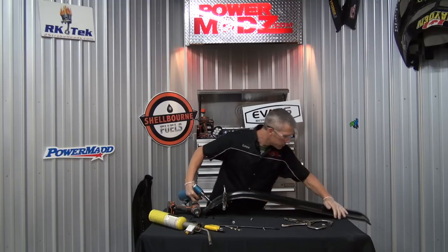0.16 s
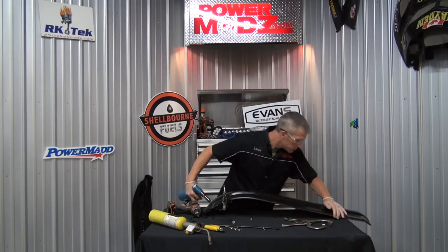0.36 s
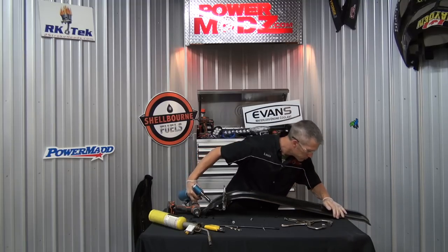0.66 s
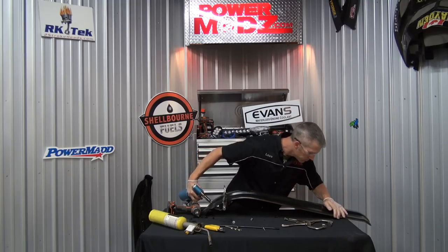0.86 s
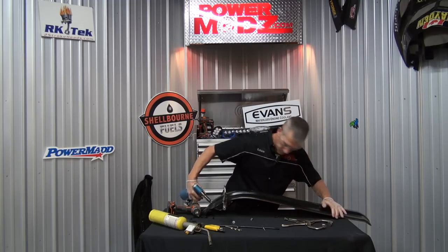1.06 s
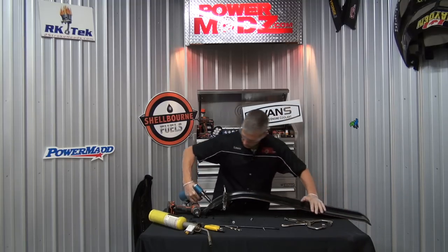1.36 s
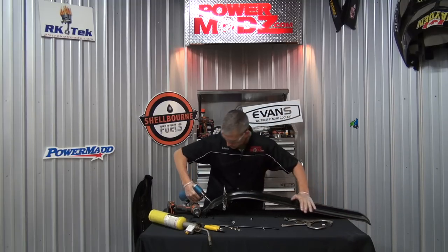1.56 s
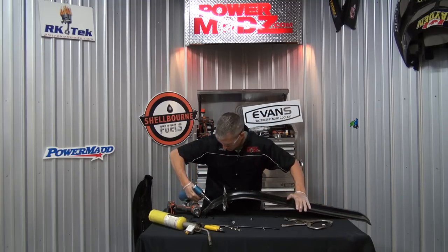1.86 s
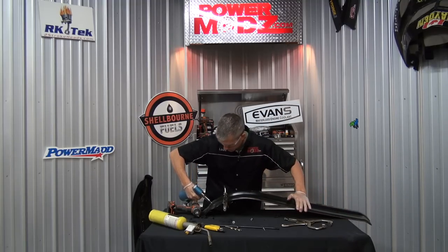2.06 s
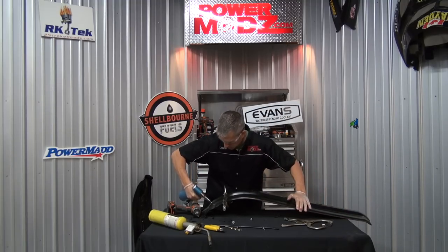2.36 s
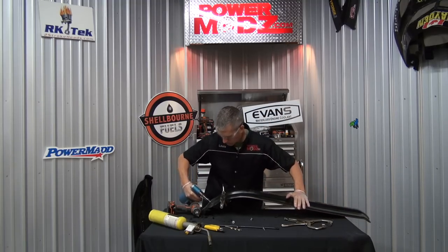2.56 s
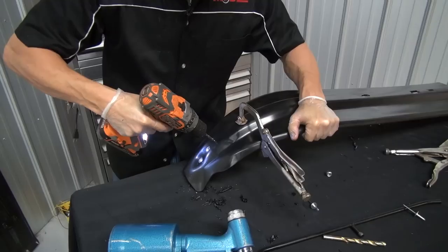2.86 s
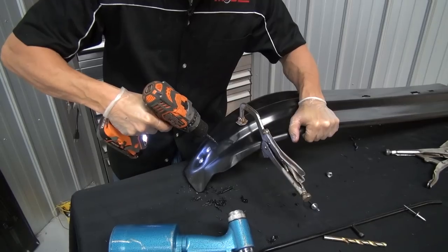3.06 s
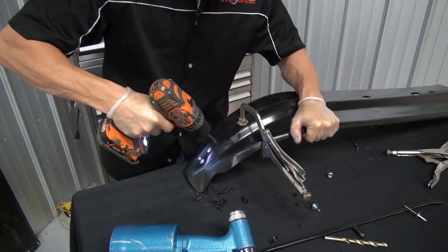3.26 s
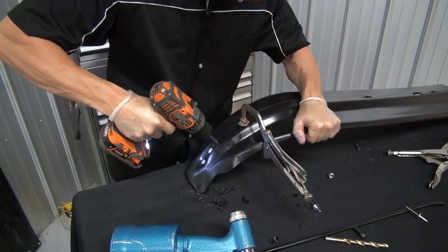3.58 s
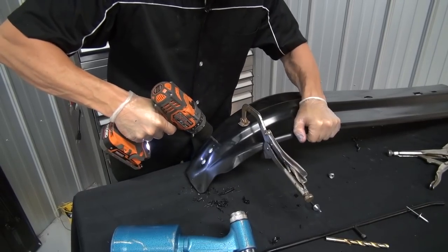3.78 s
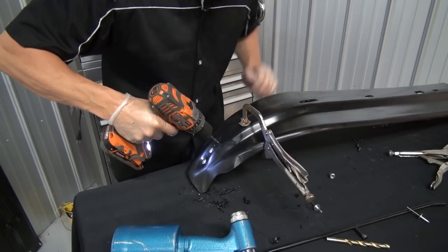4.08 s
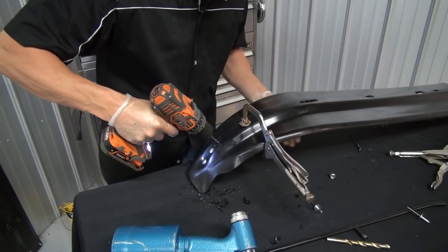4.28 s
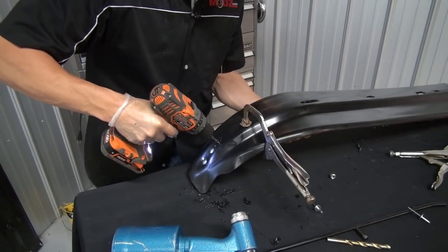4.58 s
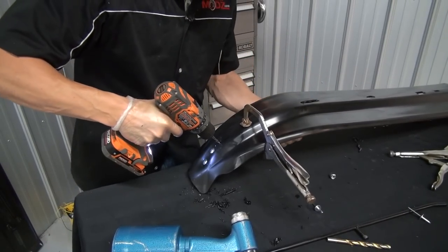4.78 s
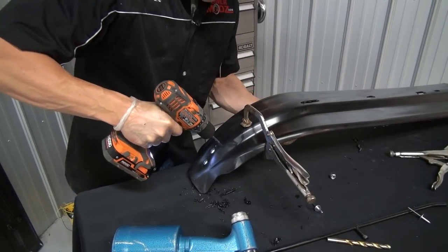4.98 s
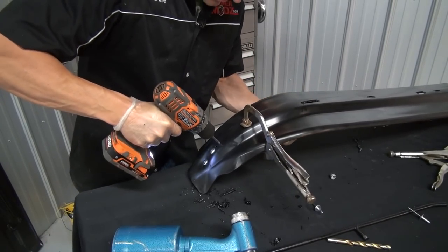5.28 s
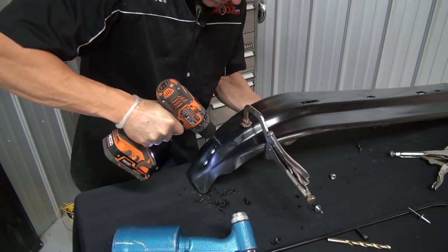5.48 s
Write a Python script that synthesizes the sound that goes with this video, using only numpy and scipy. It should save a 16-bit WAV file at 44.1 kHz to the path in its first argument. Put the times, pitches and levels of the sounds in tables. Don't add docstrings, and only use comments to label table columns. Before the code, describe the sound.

A steady faint air hiss fills a metal-walled workshop. A plastic ski lands on a bench with a hard double knock, is lightly rubbed, then banged, dragged and slid with bright gritty scrapes. The sound cuts to a closer position with louder hiss, where a cordless drill spins up, whines and brakes, then after quiet handling and a rubbery squeak starts again. One microphone, distant at first, then near.

```python
import sys
import numpy as np
from scipy import signal
from scipy.fft import rfft, irfft
from scipy.io import wavfile
from scipy.ndimage import uniform_filter1d, map_coordinates

SR = 44100
rng = np.random.default_rng(int(sys.argv[2]) if len(sys.argv) > 2 else 0)


def materialize(psi):
    bounded = np.clip(np.atleast_2d(psi).T, -1, 1)
    quanta = np.round(bounded * 32767).astype(np.int16)
    wavfile.write(sys.argv[1], SR, quanta)


def convert_level_to_amplitude(level_db):
    exponent = np.asarray(level_db, float) / 20
    return 10 ** exponent


N = 248272
NEARER_S = 2.898

# (frequency [Hz], density [dB per Hz])
FAR_LEAK_COLOUR = [(40, -45), (70, -18), (130, -11.5), (300, -15), (650, -9.5), (950, -9), (1900, -14),
                   (2700, -6.5), (4400, -11.5), (8500, -13), (10200, -5), (11500, -12.5), (14500, -11.5),
                   (16000, -19.5)]
NEAR_LEAK_COLOUR = [(40, -45), (70, -16.5), (220, -14.5), (550, -10), (1060, -7.5), (1780, -12.5),
                    (2350, -3.5), (3900, -11.5), (6000, -5.5), (8500, -4), (10300, -4), (12400, -8.5),
                    (15000, -5.5), (16000, -17.5)]
# (time [s], peak [dB], thud re peak [dB], snap re peak [dB], contact T60 [s])
SKI_KNOCKS = [(0.04, -41.5, -9, -13, 0.015), (0.139, -35, -10.5, -10.5, 0.051),
              (0.151, -35.5, -6, -18, 0.034), (0.176, -40.5, 5.5, -4.5, 0.05), (0.21, -10, -10, -25, 0.026),
              (0.219, -.3, -11, -17.5, 0.042), (0.256, -19.5, -6, -20.5, 0.052),
              (1.311, -32.5, -5.5, -23, 0.055), (1.122, -52, -10, 3, .015), (1.54, -56, -10, 5, .012),
              (1.565, -41, -18, 1.5, 0.016), (1.671, -47, -9, 1.5, 0.046), (1.947, -28.5, -9, -8, 0.083),
              (2.127, -14, -20, -9.5, 0.083), (2.25, -1, -16.5, -2, 0.056),
              (2.526, -13.5, -15.5, 3.2, 0.06), (2.84, -21, -16, -2.5, 0.034),
              (3.185, -34.5, 0.5, -2, 0.0396), (4.885, -39, -32, -8, 0.04)]
# (frequency [Hz], level [dB], T60 [s])
SKI_MODES = [(625, 0.5, 0.011), (824, -1, 0.014), (1027, 1, 0.015), (1250, -3, 0.0086), (1485, -8, 0.011),
             (2190, -9, .006), (2850, -17, .004)]
BENCH_MODES = [(126, -15, 0.043), (210, -4.5, 0.088), (306, 3.5, .03), (404, 4.5, 0.042),
               (510, -6.5, 0.037)]
# (frequency [Hz], T60 [s])
SHOP_DECAY = [(100, 0.67), (600, 0.84), (2000, 0.79), (5000, 0.77), (12000, 0.26)]
# (loudest [s], 20 dB rise [s], 20 dB fall [s], scrape [dB], brightness [dB])
RUB_STROKES = [(.042, .012, 0.063, -57.5, -9.5), (.142, .025, 0.059, -52.5, -11),
               (1.15, 0.26, 0.13, -55.5, 3), (1.27, .1, .1, -51, 6.5), (1.325, .02, .045, -54.5, -18.5),
               (1.42, .2, 0.61, -55.5, -1.2), (1.575, 0.035, .06, -57, -4), (1.7, 0.32, .35, -61, -1.5),
               (1.951, .003, 0.047, -50, -19), (2.008, .012, .02, -46.5, 4), (.265, .03, .12, -51, -22),
               (4.02, .03, .14, -58, -16), (4.885, .1, .18, -54, -1), (5.0, .06, 0.028, -51, 0)]
DRAG_STROKES = [
    (2.13, .01, .045, -27, 10.5),
    (2.133, .008, .045, -33, -14),
    (2.19, 0.04, .04, -32, 13.5),
    (2.27, 0.0061, 0.0163, -35, -12),
    (2.34, 0.0522, 0.2328, -20.5, -3.5),
]
SLIDE_STROKES = [
    (2.531, 0.0063, .1, -14.5, 3.5),
    (2.63, 0.097, .3, -21, 5),
    (2.72, 0.27, 0.22, -30.5, 0.5),
    (2.88, 0.17, .05, -31.5, -3.5),
]
# (frequency [Hz], density [dB per Hz])
RUB_TONE = [(59, -50), (100, -8.5), (206, -9), (524, -1.5), (595, 2), (1030, -6), (1170, -17), (1310, -10),
            (1650, -21.5), (4570, -13), (16000, -14)]
DRAG_TONE = [(88, -40), (150, -15), (205, -6.5), (637, 1), (1060, -5), (1140, 6), (1360, -3.5),
             (1540, -3.5), (1940, -19), (3160, -8), (3490, -15.5), (12700, -11), (16000, -24)]
SLIDE_TONE = [(180, -29.5), (300, -17.5), (555, -6), (978, -8), (1140, -3), (1930, -15.5), (2700, 1),
              (3460, -3), (4230, -1), (4750, -6), (6700, .5), (9390, -6), (14000, -2.5), (16000, -13.5)]
# (time [s], level [dB], length [s], pitch [Hz])
RUBBER_SLIPS = [
    (1.088, -60.5, .038, 720),
    (1.145, -51, .054, 716),
    (1.192, -55.5, .04, 720),
    (1.574, -53, .015, 1190),
    (4.896, -56, .025, 1450),
    (4.91, -50, .04, 520),
    (4.995, -50.5, .05, 620),
    (5.04, -46, .04, 700),
]
# (pull [s], release [s], full-speed rush [dB], time to bite [s], full-speed gear whine [dB])
TRIGGER_PULLS = [
    (3.185, 3.965, -19.5, 0.031, -25.5),
    (5.006, 5.7, -18.5, .007, -28.5),
]
# (time [s], speed [turns per s])
FIRST_RUN_SPEED = [(3.19, 110), (3.335, 243), (3.38, 270), (3.45, 288), (3.52, 297), (3.62, 304),
                   (3.76, 308.7), (3.92, 309.2), (4.0, 285)]
SECOND_RUN_SPEED = [(5.0, 104), (5.11, 212), (5.14, 238), (5.175, 259), (5.22, 275), (5.28, 288),
                    (5.34, 294.5), (5.41, 298.4), (5.63, 298.6)]
# (frequency [Hz], density [dB per Hz])
RUSH_COLOURS = [
    [(250, -24), (420, -10), (528, -12), (605, -4.5), (663, -6.5), (1490, -6), (1760, -15), (3440, -6.5),
     (5260, -10), (6420, -14.5), (7360, -10), (8830, -19.5), (12900, -14.5), (16000, -24)],
    [(130, -28.5), (420, -10), (587, -5), (1100, -6.5), (1360, -5.5), (1870, -12.5), (2140, -4), (4250, -5),
     (4590, -3.5), (5030, -4.5), (6920, -4), (7700, -7), (9980, -8), (16000, -20.5)],
]
# (multiple of motor turn [-], first run [dB], second run [dB])
MOTOR_TONES = [(1, -40, -41.5), (2, -37.5, -39), (3, -42, -45), (4, -46, -47), (5, -42, -46),
               (10, -40, -42), (12, -40, -45), (13, -42, -41), (14, -48, -41), (17, -42, -48),
               (20, -42, -41), (24, -46, -44), (30, -48, -42), (50, -53, -49)]
PLANET_TONES = [(11.255, -32.5, -37), (22.51, -46, -37)]
# (time [s], peak [dB])
GRIP_JOLTS = [
    (3.188, -39),
    (3.484, -29.5),
    (3.542, -33),
    (3.715, -32),
    (3.882, -33),
    (3.95, -30),
    (3.992, -29.5),
]


def rms_one(x):
    return x / np.sqrt(np.mean(x ** 2) + 1e-20)


def in_time(rows):
    s, *columns = np.transpose(rows)
    return [np.interp(np.arange(N) / SR, s, c) for c in columns]


def sounding(rows, fade_s):
    t = np.arange(N) / SR
    return np.clip(np.minimum(t - rows[0][0], rows[-1][0] + fade_s - t) / fade_s, 0, 1)


def from_slow(values):
    return np.interp(np.arange(N) / 32, np.arange(len(values)), values)


def at_hz(points, hz):
    points_hz, db = np.transpose(points)
    return np.interp(np.log(np.maximum(hz, 1)), np.log(points_hz), db)


def coloured(x, spectrum):
    gain = convert_level_to_amplitude(at_hz(spectrum, np.fft.rfftfreq(N, 1 / SR)))
    return rms_one(irfft(rfft(x) * gain, N))


def split(x, low_hz, high_hz):
    bands = [(low_hz, "low"), ([low_hz, high_hz], "band"), (high_hz, "high")]
    filters = [signal.butter(3, hz, kind, fs=SR, output="sos") for hz, kind in bands]
    return [rms_one(signal.sosfilt(sos, x)) for sos in filters]


def drift(rate):
    r = np.exp(-64 * np.pi * rate / SR)
    slow = signal.lfilter([1], [1, -2 * r, r * r], rng.standard_normal(N // 32 + 2002))[2000:]
    return from_slow(rms_one(slow))


def grains(per_s, spread_db):
    sizes = convert_level_to_amplitude(spread_db * np.minimum(rng.exponential(1, N), 4)) * rng.choice([-1, 1], N)
    return rms_one(sizes * (rng.random(N) < per_s / SR))


def ring(clicks, hz, t60):
    r, w = convert_level_to_amplitude(-60 / (t60 * SR)), 2 * np.pi * hz / SR
    return signal.lfilter([0, np.sin(w)], [1, -2 * r * np.cos(w), r * r], clicks + 1e-18)


def dying(events):
    out, t = np.zeros(N + SR), np.arange(SR // 2) / SR
    for start_s, peak_db, t60 in events:
        i = round(start_s * SR)
        attack = np.clip(t / .0006, 0, 1)
        out[i:i + len(t)] += convert_level_to_amplitude(peak_db - 60 * t / np.clip(t60, .003, .2)) * attack
    return out[:N]


def far_leak():
    rise_db = 1.7 * np.clip(np.arange(N) / SR - 1.05, 0, 1)
    level_db = -55.5 + rise_db + .5 * drift(1.7)
    return convert_level_to_amplitude(level_db) * coloured(rng.standard_normal(N), FAR_LEAK_COLOUR)


def knocks():
    s, peak_db, thud_db, snap_db, t60 = np.transpose(SKI_KNOCKS)
    contact = dying(zip(s, peak_db, t60)) * rng.standard_normal(N)
    thud = dying(zip(s, peak_db + thud_db, t60)) * rng.standard_normal(N)
    _, snap, crack = split(rng.standard_normal(N), 1900, 5100)
    snap = snap * dying(zip(s, peak_db + snap_db - 6.5, 0.85 * t60))
    crack_db = peak_db + 2.5 * snap_db + 1.0
    crack = crack * dying(zip(s, crack_db, 0.65 * t60))
    ski, bench = 0, 0
    for k, (hz, db, decay) in enumerate(SKI_MODES):
        ski = ski + convert_level_to_amplitude(db - 19.5) * ring(contact, hz, decay) * (-1) ** k
    for k, (hz, db, decay) in enumerate(BENCH_MODES):
        bench = bench + convert_level_to_amplitude(db - 23) * ring(thud, hz, decay) * (-1) ** k
    return ski + bench + snap + crack


def shop_tail():
    t, edges, tail = np.arange(SR) / SR, 70 * 2.0 ** np.arange(0, 8.1, .5), 0
    for low, high in zip(edges, edges[1:]):
        band = signal.butter(2, [low, high], "band", fs=SR, output="sos")
        noise = signal.sosfilt(band, rng.standard_normal(SR))
        tail = tail + noise * convert_level_to_amplitude(-60 * t / at_hz(SHOP_DECAY, np.sqrt(low * high)))
    low_cut = signal.butter(2, 190, "high", fs=SR, output="sos")
    tail = signal.sosfilt(low_cut, tail)
    tail = tail * np.clip((t - .004) / 0.0037, 0, 1)
    return tail / np.sqrt(np.sum(tail ** 2))


def shop(x, wet_db, tail):
    return x + convert_level_to_amplitude(wet_db) * signal.fftconvolve(x, tail)[:N]


def friction(strokes, colour, mix_db):
    grit = 0.85 * rng.standard_normal(N) + grains(2500 * convert_level_to_amplitude(3.0 * drift(25)), spread_db=3.0)
    pitches = np.geomspace(2200, 14000, 12) * rng.uniform(.93, 1.07, 12)
    streaks = sum(convert_level_to_amplitude(3 * drift(5)) * rms_one(ring(grit, hz, t60=30 / hz)) for hz in pitches)
    layers = split(coloured(grit + 0.1 * streaks, colour), 1800, 5000)
    s, rise_s, fall_s, scrape_db, bright_db = np.transpose(strokes)[:, :, None]
    late = np.arange(0, N + 32, 32) / SR - s
    slow_db = -20 * np.maximum(-late / rise_s, late / fall_s)
    fades = (0.83, 1.06, 1.33)
    out = 0
    for k, layer in enumerate(layers):
        level_db = scrape_db - 2.5 + mix_db[k] + (k - 1) * bright_db + fades[k] * slow_db
        out = out + layer * from_slow(convert_level_to_amplitude(level_db).sum(axis=0))
    return out


def squeaks():
    t, grit, out = np.arange(N) / SR, rng.standard_normal(N), 0
    for s, db, length, hz in RUBBER_SLIPS:
        swell = np.exp(-((t - s) / length * 2.06) ** 2)
        out = out + convert_level_to_amplitude(db) * swell * rms_one(ring(grit, hz, t60=0.068))
    return out


def near_leak():
    leak = coloured(rng.standard_normal(N), NEAR_LEAK_COLOUR)
    delay_ms = .18
    echo = map_coordinates(leak, [np.arange(N) - delay_ms * SR / 1000], order=3, mode="wrap")
    return convert_level_to_amplitude(-46 + .5 * drift(1.6)) * rms_one(leak + convert_level_to_amplitude(-13.5) * echo)


def drill(pull, speed, which):
    pull_s, release_s, full_db, bite_s, whine_db = pull
    t = np.arange(N) / SR
    turns = uniform_filter1d(in_time(speed)[0], size=900)
    phase = 2 * np.pi * np.cumsum(turns) / SR
    share = turns / turns.max()
    speed_db = 20 * np.log10(share)
    bite_db = -32 * np.exp(-np.maximum(t - pull_s, 0) / bite_s)
    brake_db = -330 * np.maximum(t - release_s, 0)
    rush_db = full_db + 1.14 * speed_db + bite_db + brake_db

    chuck = convert_level_to_amplitude(0.54 * np.sin(phase / 12.4) + .5 * drift(18))
    rattle = rng.standard_normal(N) + .5 * grains(5000, spread_db=2.5)
    rattle = rattle * (1 + .25 * np.cos(phase))
    low, middle, high = split(coloured(rattle, RUSH_COLOURS[which]), 1755, 8460)
    gusts = split(rng.standard_normal(N), 1400, 2800)[0]
    whoosh = gusts * np.sqrt(2) * np.cos(39 * phase)
    high = rms_one(high + convert_level_to_amplitude(-8.5) * whoosh)
    rumble_db = (-10, -8.5)[which]
    hiss_db = (-7.5, -5.5)[which] + (-.3, 2.3)[which] * speed_db
    rush = convert_level_to_amplitude(rush_db - 2.0) * chuck * (convert_level_to_amplitude(rumble_db) * low + middle + convert_level_to_amplitude(hiss_db) * high)

    lock_db = (9.5, 4.8)[which] * np.tanh((1 - share) / (.033, .015)[which])
    whine_db = whine_db - (1.2, .25)[which] * speed_db ** 2 - lock_db
    slack_db = 3 * speed_db
    effort_db = .5 * (rush_db - rush_db.max())
    on = (t > pull_s) & (t < speed[-1][0] + .05)
    slack_db, effort_db, phase, turns = slack_db[on], effort_db[on], phase[on], turns[on]
    tones = convert_level_to_amplitude(whine_db[on] + effort_db) * np.sin(15 * phase)
    for multiple, *level_db in MOTOR_TONES + PLANET_TONES:
        steepness, waver = .9, .25
        if multiple > 2:
            steepness, waver = (.8 if multiple % 1 else 1.5), 1
        wander_db = 2 * waver * drift(6.5)[on]
        gain = convert_level_to_amplitude(level_db[which] + steepness * slack_db + effort_db + wander_db)
        tones += gain * np.sin(multiple * phase + .5 * waver * drift(15)[on] + rng.uniform(0, 2 * np.pi))
    housing = convert_level_to_amplitude(-23.5) / (1 + ((10 * turns - 2116) / 220 * 2) ** 2) ** 2
    tones += housing * np.sin(10 * phase)
    gate = sounding(speed, fade_s=0.0067) * convert_level_to_amplitude(.6 * brake_db)
    rush[on] += np.sqrt(2) * tones * gate[on]
    return (t > pull_s) * rush


def jolts():
    clicks = np.zeros(N)
    for s, db in GRIP_JOLTS:
        clicks[round(s * SR)] = convert_level_to_amplitude(db)
    soft = signal.fftconvolve(clicks, np.hanning(SR // 300))[:N]
    thumps = ring(soft, 157, t60=0.061) + 0.94 * ring(soft, 227, t60=0.093)
    brake = dying([(3.962, -18.5, .03)]) * split(rng.standard_normal(N), 9700, 14500)[1]
    return convert_level_to_amplitude(-42.0) * thumps + brake


def scene():
    near = np.clip((np.arange(N) / SR - NEARER_S) / 0.0026, 0, 1)
    handling = knocks() + squeaks()
    handling += friction(RUB_STROKES, RUB_TONE, (-1.5, 0, -1))
    handling += friction(DRAG_STROKES, DRAG_TONE, (-0.1, 2.5, -6))
    handling += friction(SLIDE_STROKES, SLIDE_TONE, (-4.5, -.3, 2.2)) * (1 - near)
    tool = drill(TRIGGER_PULLS[0], FIRST_RUN_SPEED, which=0)
    tool += drill(TRIGGER_PULLS[1], SECOND_RUN_SPEED, which=1) + jolts()
    tail = shop_tail()
    far_sound = shop(handling, -13, tail) + far_leak()
    near_sound = shop(near * handling + tool, -18.5, tail) + near_leak()
    mono = (1 - near) * far_sound + near * near_sound
    return np.array([mono, mono])


def roll_off(x):
    return signal.sosfilt(signal.butter(12, 16430, fs=SR, output="sos"), x)


def record(dry):
    heard = signal.sosfilt(signal.butter(2, 89, "high", fs=SR, output="sos"), dry)
    heard = signal.sosfilt(signal.ellip(10, .3, 60, 15760, fs=SR, output="sos"), heard)
    overload = np.maximum(np.abs(heard) - .55, 0)
    settle = np.exp(-1 / (.06 * SR))
    drained = signal.lfilter([1], [1, -settle], overload)
    offset = -convert_level_to_amplitude(-57.5) * uniform_filter1d(drained, size=300, origin=149)
    return roll_off(np.clip(heard, -1, 1) + offset)


dry = scene()
out = record(dry)
materialize(out)
```